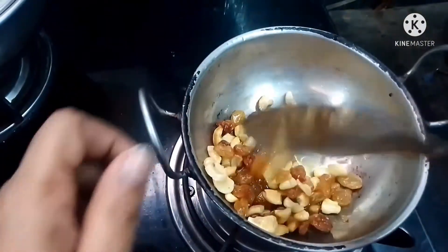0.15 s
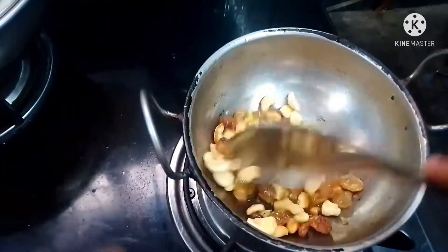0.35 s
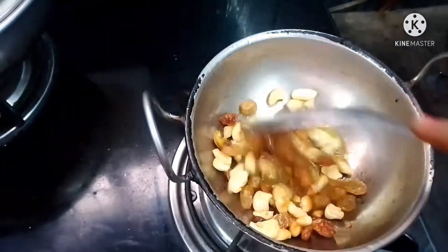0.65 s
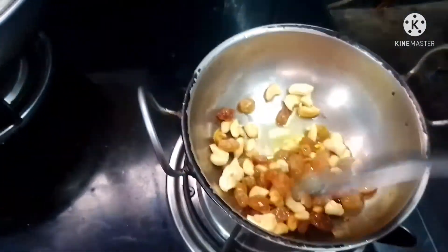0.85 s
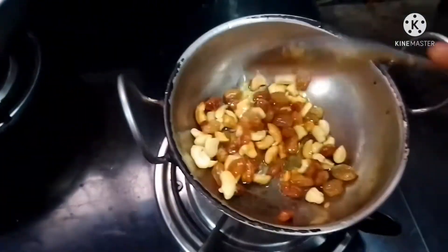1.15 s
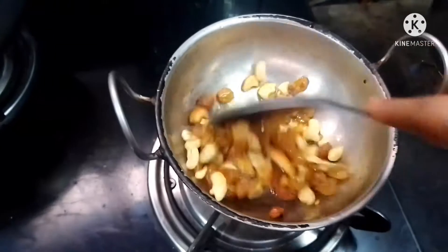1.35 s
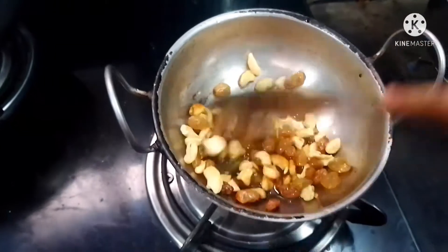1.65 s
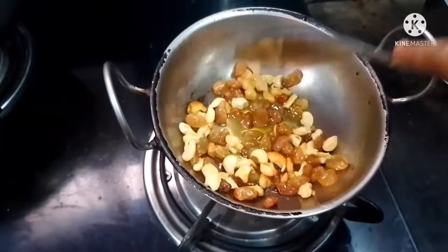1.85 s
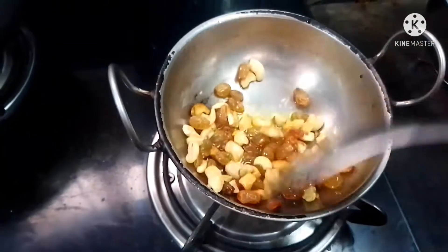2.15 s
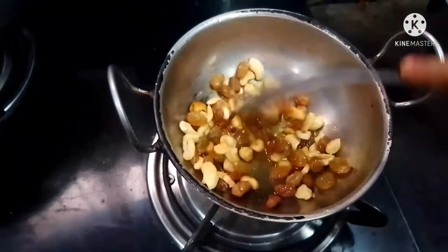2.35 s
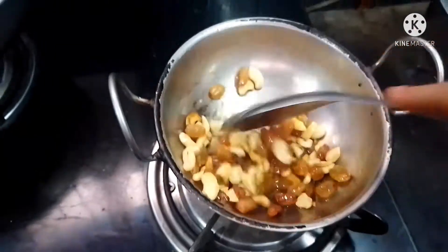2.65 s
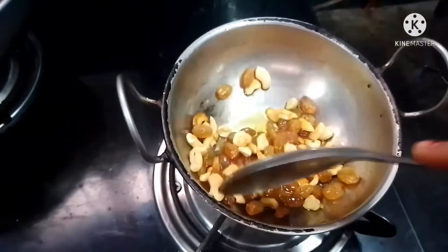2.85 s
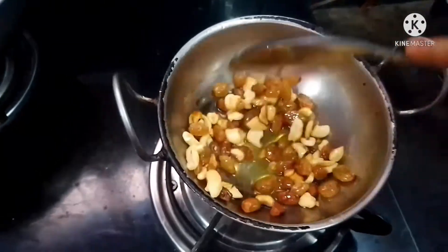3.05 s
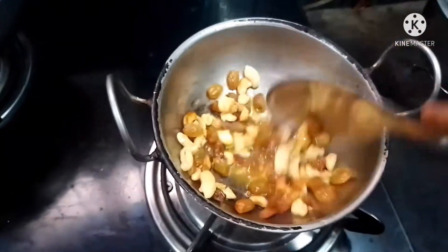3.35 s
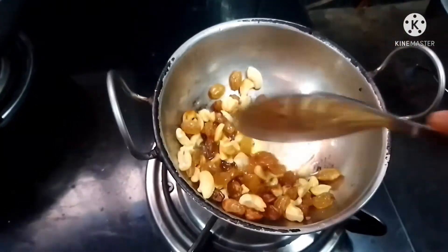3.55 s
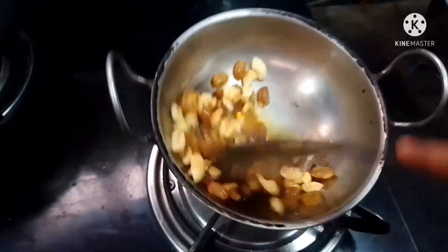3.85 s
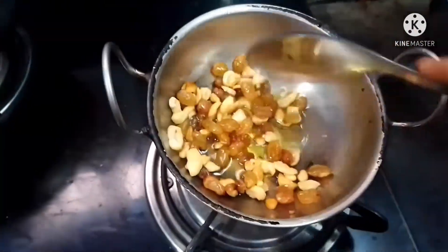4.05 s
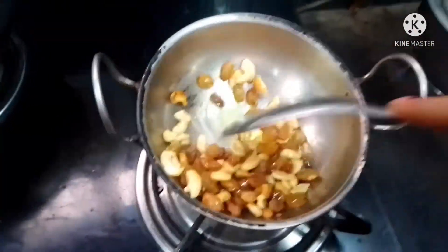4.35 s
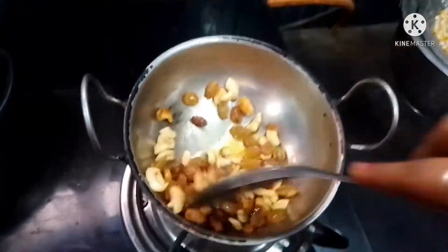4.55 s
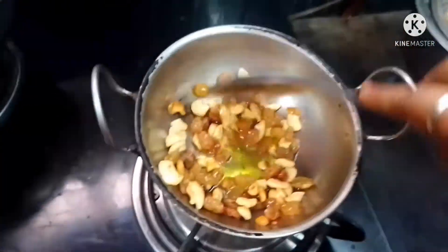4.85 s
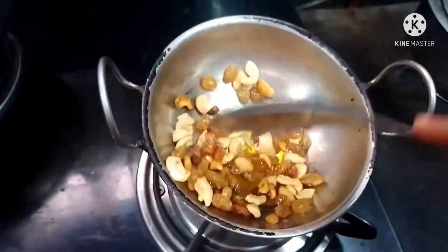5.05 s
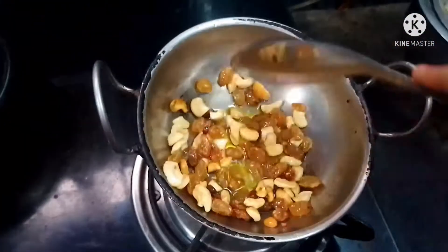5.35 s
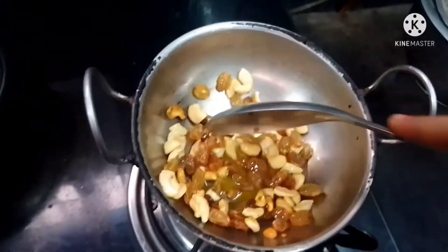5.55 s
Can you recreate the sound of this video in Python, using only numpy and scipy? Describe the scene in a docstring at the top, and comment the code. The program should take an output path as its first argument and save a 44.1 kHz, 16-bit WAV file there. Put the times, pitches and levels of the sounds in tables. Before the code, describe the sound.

Nuts and raisins fry in a little fat in a small steel pan, with a light sizzle and sharp, irregular pops. A metal spoon stirs throughout, scraping the pan and making the sizzle flare. It clinks and rings several times in the first two seconds, then carries on with softer scrapes and faint rasps. The microphone is close, with a gas flame rushing faintly behind.

```python
"""Cashews and raisins frying in ghee

At a kitchen stove, close to a small steel pan. Steam bubbles spit and crackle in a little fat.
A steel spoon knocks, rings and scrapes along the pan, and its strokes make the sizzle flare;
the gas flame rushes softly behind. One phone microphone: its port resonates in the treble,
and it overloads on the sharpest cracks."""
import sys
import numpy as np
from scipy import signal
from scipy.fft import rfft, irfft, next_fast_len
from scipy.io import wavfile
from scipy.ndimage import map_coordinates

SR = 44100
rng = np.random.default_rng(int(sys.argv[2]) if len(sys.argv) > 2 else 0)


def output_pcm(signal):
    """Save a mono or channel-first signal as 16-bit PCM at the path in sys.argv[1].

    Samples are clipped to [-1, 1] before scaling.
    """
    pcm = np.clip(np.atleast_2d(signal).T, -1, 1) * 32767
    wavfile.write(sys.argv[1], SR, np.round(pcm).astype(np.int16))


N = 251610
TIME = np.arange(N) / SR
HIT_SIZE = 16384   # samples in one crack with its echoes
REST_SIZZLE_DB = -43.5   # the sizzle's gain between strokes

# Levels are relative within each column.
# the loudest steam bubbles bursting in the fat: t/s, level/dB, f/Hz, Q
STEAM_BURSTS = [(0.1155, -10, 2530, 3.4), (0.125, -8, 4020, 5.2), (0.1827, -9, 4900, 0.93),
                (0.198, -9.5, 4050, 2.6), (0.2021, -6.5, 3380, 7.9), (0.3434, -12, 5300, 0.78),
                (0.4213, -17.5, 6200, 0.89), (0.4598, -18.5, 6900, 1.44), (.5302, -26, 8050, 1.4),
                (0.6717, -21, 8600, 0.69), (.8181, -7, 2700, 0.84), (0.8803, -18, 11300, 3.8),
                (0.9116, -26, 7080, 18), (0.942, -24.5, 7800, 3.1), (1.0241, -13, 5360, 0.93),
                (1.0455, -15, 3000, 0.66), (1.1007, -16, 5200, 1.5), (1.1305, -13, 4200, 1.4),
                (1.1988, -22, 10400, 12), (1.2088, -14.5, 5540, 1.9), (1.221, -20, 3250, 0.48),
                (1.2725, -17, 4100, 3.2), (1.3903, -11.5, 6300, 6), (1.445, 4.5, 3960, 0.81),
                (1.493, 6.5, 3330, 0.74), (1.528, -11, 8100, .7), (1.5814, 4.5, 2400, 0.39),
                (1.6965, -15, 5760, 3.8), (1.7074, -15.5, 3880, 2.9), (1.726, 1, 1820, 1.46),
                (1.781, -20, 5100, 15), (1.8147, -18.5, 4060, 9.5), (1.9015, -11.5, 8950, 0.82),
                (1.9533, -6.5, 8650, 0.74), (2.302, -13.5, 3500, 0.52), (2.3533, -22, 4030, 10),
                (2.3752, -17.5, 2620, 1.6), (2.4, -19.5, 5450, 9.6), (2.4678, -11, 4740, 0.64),
                (2.5904, -17, 5500, 0.38), (2.6487, -22.5, 5000, 0.5), (2.7023, -13, 9460, 2.9),
                (2.764, -15.5, 7400, 2.9), (2.853, -28, 8000, 6), (2.905, -23.5, 6830, 7.4),
                (2.918, -28.5, 8240, 6.5), (3.0134, -15, 6900, 2.5), (3.038, -22, 7970, 9.1),
                (3.187, 5.5, 3130, 0.22), (3.3622, -25.5, 4920, 4.9), (3.4793, -20, 6100, 0.41),
                (3.6647, -23.5, 7870, 18), (3.701, -13, 7320, 8.9), (3.7143, -20, 5080, 13),
                (3.8174, -18, 8100, 1.06), (3.835, -13.5, 10450, 4.2), (3.889, -22.5, 10730, 31),
                (4.216, -35, 10200, 3.7), (4.265, -25, 11300, 2.9), (4.3293, -24, 6700, 7.1),
                (4.3544, -15, 1800, 2.3), (4.4635, -27.5, 8300, 6.6), (4.498, -27, 8860, 8),
                (4.5104, -19.5, 6560, 1.1), (4.6621, -19.5, 6040, 1.8), (4.9124, -25, 6900, 5.8),
                (5.0334, -28, 8440, 6), (5.071, -18, 8400, 4.7), (5.1387, -19.5, 4450, 2.5),
                (5.1658, -29, 8500, 13), (5.3382, -19, 5550, 4.2), (5.3914, -21, 3640, 6),
                (5.4688, -11.5, 3060, 3.7), (5.5576, -33, 8750, 14), (5.5652, -22.5, 4020, 9)]
# spectrum of the sizzling fat: f/Hz, level/dB
SIZZLE_SPECTRUM = [(1500, -56), (3000, -13), (5000, -4.5), (7000, -9), (10000, -2), (15000, 7)]
# strokes of the spoon: t/s, length/s, bowl dragging/dB, edge grating/dB, sizzle flare/dB
SPOON_STROKES = [(0.031, 0.016, -45, -29.5, -40), (0.109, 0.18, -64, -42, -20),
                 (.36, 0.16, -75, -55.5, -23.5), (0.697, 0.013, -41.5, -32.5, -12.5),
                 (0.764, 0.13, -54.5, -46.5, -28), (1.037, 0.024, -46, -41.5, -17),
                 (1.137, 0.11, -76, -55, -28), (1.345, 0.12, -35.5, -35, -33),
                 (1.504, 0.11, -46.5, -42, -36), (1.651, 0.14, -69, -40, -17),
                 (1.962, 0.17, -40, -36, -18.5), (2.298, 0.1, -51, -44, -16.5),
                 (2.7, 0.075, -50.5, -38.5, -38), (2.951, 0.051, -48.5, -46.5, -23),
                 (3.035, 0.18, -55.5, -48, -11.5), (3.596, 0.16, -54.5, -75, -21.5),
                 (3.962, .17, -77, -52.5, -35.5), (4.347, 0.042, -64, -42.5, -22),
                 (4.453, 0.093, -50.5, -56, -34), (4.647, 0.16, -52.5, -45, -53),
                 (4.935, 0.48, -63, -49, -58), (5.46, .12, -56.5, -46.5, -37)]
# spoon meets pan: t/s, click/dB, spoon ring/dB, pan ring/dB
SPOON_KNOCKS = [(0.0299, 2.5, -36, -64), (0.6955, -3.5, -21.5, -42.5), (1.0467, -42, -40.5, -56),
                (1.329, 10.5, -23, -34), (1.385, -31, -56, -37), (1.419, -13, -41, -54),
                (1.661, -21, -37.5, -51), (1.9708, 5.5, -23.5, -39), (2.031, -25, -32, -41)]
# the spoon's edge rubs on bare steel: t/s, length/s, level/dB
SPOON_RUBS = [(1.41, .05, -39), (1.67, 0.12, -46), (2.96, .23, -51), (3.97, .15, -52.5), (4.985, .085, -47)]
# the sliding spoon catches: t/s, length/s, starting f/Hz, level/dB
SPOON_CATCHES = [(1.04, 0.11, 440, -53.5), (2.32, 0.72, 2910, -60), (2.71, 0.14, 305, -48),
                 (2.93, 0.18, 295, -45), (2.93, 0.083, 835, -48), (3.02, 0.18, 2300, -54),
                 (3.61, 0.084, 820, -51.5), (3.62, 0.11, 430, -47), (4.46, 0.19, 305, -50.5),
                 (4.44, 0.097, 2290, -52.5), (4.645, .12, 2110, -52)]
# the spoon's modes: f/Hz, level/dB, t60/s
SPOON_MODES = [(4368, -1, .17), (5832, -9, .28), (6057, 0, .16), (6718, -16, .1), (8280, -9, .1),
               (8603, -13, .09)]
# the pan's modes, damped by the food: f/Hz, level/dB, t60/s
PAN_MODES = [(270, -7, .45), (328, -10, .28), (400, -12, .2), (620, -9, .25), (781, -3, .28), (922, -4, .3),
             (1093, -10, .25), (1370, -8, .2), (1600, -9, .22), (1790, -7, .15), (2277, -8, .18),
             (2480, -6, .16), (3060, 0, .13), (3548, -4, .14), (3950, -5, .16), (4990, -11, .14)]
# spectrum of the spoon's bowl dragging on the pan: f/Hz, level/dB
DRAG_SPECTRUM = [(90, -17), (120, -6), (160, -28), (210, -14), (265, 2), (340, 5), (420, 0), (560, -9),
                 (680, -12), (780, -8), (930, -3), (1300, -19)]
# spectrum of the spoon's edge grating: f/Hz, level/dB
GRATE_SPECTRUM = [(900, -39), (1500, 7.5), (2200, -1.5), (3000, -4), (4500, -34), (8000, 0.5)]
# spectrum of the burner and the kitchen behind it: f/Hz, level/dB
BURNER_SPECTRUM = [(25, -9), (40, -9), (65, -19), (113, -16), (165, -26), (250, -7), (340, -1), (440, -8),
                   (600, -15), (780, -10), (940, -8), (1400, -17), (1700, -19), (2400, -26)]


def spits():
    """Single loud bursts of steam through the fat; the harder, the snappier."""
    out = np.zeros(N)
    for start, db, hz, q in STEAM_BURSTS:
        add(out, start, from_db(db) * crack(hz, q, snap=-0.39 + 0.14 * (db + 13)))
    return out


def sizzle(flare, bubble_q=13.5):
    """A mist of tiny bursts, with sparser bubbles that each ring briefly at a pitch of their own."""
    f = np.fft.rfftfreq(N, 1 / SR)
    mist = coloured(grains(per_s=8000), SIZZLE_SPECTRUM)
    rings = sum(rfft(grains(per_s=25, spread_db=4)) * resonance(f, hz, bubble_q) * 1j * f / hz
                for hz in np.geomspace(3000, 13000, 16))
    bubbles = coloured(in_kitchen(irfft(rings, N)), SIZZLE_SPECTRUM)
    spurts = from_db(2.2 * drift(per_s=45))
    return flare * spurts * (from_db(-26.5) * mist + from_db(-26) * bubbles)


def crackle(flare, count=90, low_hz=3700, high_hz=10500):
    """Fainter bursts at random moments and pitches, stronger while the sizzle flares."""
    out = np.zeros(N)
    boost = (flare / from_db(REST_SIZZLE_DB)) ** 0.58
    for k, (when, pitch, strength) in enumerate(rng.random((count, 3))):
        i = int((k + when) / count * N)
        hz = low_hz * (high_hz / low_hz) ** pitch
        gain = from_db(-42.5 + 6 * strength) * boost[i]
        add(out, i / SR, gain * crack(hz, q=3.16, snap=-0.39))
    return out


def stirring():
    """Gains of drag, grating and sizzle: the spoon bites, eases, lifts; wet food meets hot steel."""
    drag_db, grate_db, sizzle_db = np.transpose(SPOON_STROKES)[2:]
    contact = dict(attack_s=0.0027, sag_db_per_s=38.5, release_db_per_s=128)
    drag = swells(drag_db, rest_db=-57.5, **contact)
    grate = swells(grate_db, rest_db=-60.5, **contact)
    flare = swells(sizzle_db, REST_SIZZLE_DB, attack_s=0.029, sag_db_per_s=0, release_db_per_s=197)
    return drag, grate, flare


def knocks():
    """Steel on steel: a click, then spoon and pan ring on."""
    clicks, spoon_rings, pan_rings = np.zeros((3, N))
    for start, click_db, spoon_db, pan_db in SPOON_KNOCKS:
        lowest, *upper = ringing(SPOON_MODES, scatter_db=3)
        upper_db = 1.08 * spoon_db - 2.5   # a harder knock rings brighter
        pan = ringing(PAN_MODES, scatter_db=0.5).sum(axis=0)
        add(clicks, start, from_db(click_db) * crack(hz=2200, q=0.41, snap=-0.49))
        add(spoon_rings, start, from_db(spoon_db) * lowest + from_db(upper_db) * sum(upper))
        add(pan_rings, start, from_db(pan_db) * pan)
    flutter = from_db(2.5 * drift(per_s=120))   # the spoon chatters along the pan
    return clicks + spoon_rings * flutter + radiated(pan_rings)


def scraping(drag, grate, damping=7.9):
    """The spoon sticks and slips; as the contact travels, it favours one pan mode after another."""
    slips = in_kitchen(grains(per_s=2500))
    out = from_db(-4.5) * drag * coloured(slips, DRAG_SPECTRUM)
    out += from_db(-10) * grate * coloured(slips, GRATE_SPECTRUM)
    for hz, db, t60 in PAN_MODES[:-4]:   # rubbing hardly reaches the highest modes
        mode = radiated(rubbed(slips, hz, t60 / damping))   # the pressed spoon shortens the ring
        force = from_db(-15) * drag if hz < 1200 else from_db(-24.5) * grate
        out += force * mode * from_db(db + 5.5 * drift(per_s=11))
    return out


def pan_shimmer(grate, count=26, low_hz=1929, high_hz=7190, t60=0.067):
    """Grating excites the pan's close-set upper modes, now one, now another."""
    slips = grains(per_s=2500)
    steps = (np.arange(count) + rng.random(count)) / count
    pitches = low_hz * (high_hz / low_hz) ** steps
    modes = sum(rubbed(slips, hz, t60) * from_db(4.5 * drift(per_s=11)) for hz in pitches)
    return from_db(-10.5) * grate * rms_one(modes)


def singing(damping=2.5):
    """The rubbed spoon swells into an unsteady ring, mostly in its lowest mode; contact damps it."""
    pressure = np.zeros(N)
    for start, length, db in SPOON_RUBS:
        add(pressure, start, from_db(db) * signal.windows.hann(int(length * SR)))
    slips = grains(per_s=2500)
    lowest, *upper = (from_db(db) * rubbed(slips, hz, t60 / damping) for hz, db, t60 in SPOON_MODES[:3])
    return pressure * (lowest + from_db(-13) * sum(upper))


def squeaks(pitch_sag=0.14, jitters_per_cycle=0.24):
    """The sliding spoon catches: a narrow groan or rasp that swells and falls in pitch."""
    out = np.zeros(N)
    for start, length, hz, db in SPOON_CATCHES:
        size = int(length * SR)
        phase = 2 * np.pi * np.cumsum(np.linspace(hz, hz * (1 - pitch_sag), size)) / SR
        travel = TIME[:size] * hz * jitters_per_cycle
        jitter = [np.interp(travel, np.arange(400), knots) for knots in rng.standard_normal((2, 400))]
        rasp = jitter[0] * np.sin(phase) + jitter[1] * np.cos(phase)
        add(out, start, from_db(db) * signal.windows.tukey(size, 0.7) * rasp)
    return out


def burner(hum_hz=119):
    """Behind the pan, the soft rush of the gas flame and a faint hum in the kitchen."""
    hum = coloured(rng.standard_normal(N), [(hum_hz * 0.7, -30), (hum_hz, 0), (hum_hz * 1.4, -30)])
    flame = coloured(rng.standard_normal(N), BURNER_SPECTRUM)
    return from_db(-61.5) * flame + from_db(-78) * hum


def echoes():
    """From one spot in the pan to the microphone: direct sound, bounces in the pan, then the kitchen."""
    t = TIME[:HIT_SIZE]
    path = np.zeros(HIT_SIZE)
    pan, kitchen = (-0.5, 0.012, 0.0004), (-1, 0.16, 0.003)
    for db, t60, delay_s in (pan, kitchen):
        bounces = rng.standard_normal(HIT_SIZE) * from_db(-60 * t / t60) * (t > delay_s)
        path += from_db(db) * bounces / np.linalg.norm(bounces)
    path[0] = 1
    return path


def in_kitchen(x):
    """A continuous sound with its echoes."""
    return signal.fftconvolve(x, echoes())[:N]


def crack(hz, q, snap):
    """A sudden pulse that radiates poorly below its resonance; snap is the exponent of its treble tilt."""
    f = np.fft.rfftfreq(2 * HIT_SIZE, 1 / SR)
    body = (f / hz) ** 2 * resonance(f, hz, q)
    treble = ((1 + 1j * f / 8000) / np.sqrt(2)) ** snap
    rise = resonance(f, hz=15000, q=0.9) ** 2
    return irfft(body * treble * rise * rfft(echoes(), 2 * HIT_SIZE))[:HIT_SIZE]


def ringing(modes, scatter_db):
    """One row per mode: a dying sine, struck a little differently each time."""
    hz, db, t60 = np.transpose(modes)[:, :, None]
    t = TIME[:2 * HIT_SIZE]
    strength = from_db(db + scatter_db * rng.standard_normal(db.shape)) * rng.choice([-1, 1], db.shape)
    return strength * from_db(-60 * t / t60) * np.sin(2 * np.pi * hz * t)


def rubbed(slips, hz, t60):
    """One mode kept ringing by a run of slips; rms 1."""
    decay = from_db(-60 / (t60 * SR))
    feedback = [1, -2 * decay * np.cos(2 * np.pi * hz / SR), decay ** 2]
    return rms_one(signal.lfilter([1, 0, -1], feedback, slips))


def radiated(x, low_hz=230):
    """The small pan radiates little below its lowest mode."""
    return signal.sosfilt(signal.butter(4, low_hz, "high", fs=SR, output="sos"), x)


def swells(levels_db, rest_db, attack_s, sag_db_per_s, release_db_per_s):
    """A gain that rises with each stroke, sags while it lasts and dies back to a resting level."""
    power = from_db(rest_db) ** 2
    for (start, length, *_), db in zip(SPOON_STROKES, levels_db):
        t = np.maximum(TIME - start, 0)
        fall_db = sag_db_per_s * t + release_db_per_s * np.maximum(t - length, 0)
        power = power + (np.minimum(t / attack_s, 1) * from_db(db - fall_db)) ** 2
    return np.sqrt(power)


def grains(per_s, spread_db=3):
    """Random clicks of uneven size."""
    sizes = from_db(spread_db * np.minimum(rng.exponential(1, N), 3.5)) * rng.choice([-1, 1], N)
    return sizes * (rng.random(N) < per_s / SR)


def drift(per_s):
    """A smooth random wander with a spread of about 1."""
    knots = rng.standard_normal(int(TIME[-1] * per_s) + 2)
    coarse = TIME[::32]
    return np.interp(TIME, coarse, map_coordinates(knots, [coarse * per_s], order=3, mode="nearest"))


def coloured(x, spectrum):
    """Give a steady signal a spectrum that rolls off past both ends; rms 1."""
    hz, db = np.transpose(spectrum)
    f = np.maximum(np.fft.rfftfreq(N, 1 / SR), 1)
    shape = from_db(np.interp(np.log(f), np.log(hz), db))
    rolloff = np.minimum(f / hz[0], 1) ** 2 * np.minimum(hz[-1] / f, 1) ** 2
    return rms_one(irfft(rfft(x) * shape * rolloff, N))


def resonance(f, hz, q):
    """Response of a mass on a spring, with Q no lower than 0.4."""
    return 1 / (1 - (f / hz) ** 2 + 1j * f / (hz * max(q, 0.4)))


def from_db(db):
    """Decibels to gain."""
    return 10 ** (np.asarray(db) / 20)


def rms_one(x):
    """Scale to unit power."""
    return x / np.sqrt(np.mean(x ** 2) + 1e-20)


def add(out, start_s, sound):
    """Mix a sound in at a time."""
    i = round(start_s * SR)
    out[i:i + len(sound)] += sound[:max(0, N - i)]


def limiter(x, threshold_db=0.5, release_db_per_s=250, attack_s=0.013):
    """Loud cracks slip through, then the phone's gain ducks for a moment."""
    over_db = np.maximum(20 * np.log10(np.abs(x) + 1e-9) - threshold_db, 0)
    release_db = release_db_per_s * TIME
    held_db = np.maximum.accumulate(over_db + release_db, axis=-1) - release_db
    lag = np.exp(-1 / (attack_s * SR))
    return x * from_db(-signal.lfilter([1 - lag], [1, -lag], held_db))


def scene():
    """Close at the stove, in mono: fat and spoon in front, the burner behind."""
    drag, grate, flare = stirring()
    frying = spits() + crackle(flare) + sizzle(flare)
    spoon = knocks() + scraping(drag, grate) + pan_shimmer(grate) + singing() + squeaks()
    return (frying + spoon + burner())[None]


def record(dry, port_hz=8408, port_q=12.9, cutoff_hz=15400):
    """The phone microphone: its port rings, peaks are limited and flattened, and the top is cut."""
    size = next_fast_len(N + HIT_SIZE)
    port = resonance(np.fft.rfftfreq(size, 1 / SR), port_hz, port_q)
    limited = limiter(irfft(rfft(dry, size) * port, size)[:, :N])
    ceiling = 0.7 * (1 + 0.03 * np.sign(limited))   # lopsided overload adds a soft thump
    flattened = limited / (1 + (limited / ceiling) ** 6) ** (1 / 6)
    return signal.sosfilt(signal.ellip(10, 0.1, 70, cutoff_hz, fs=SR, output="sos"), flattened)


dry = scene()
out = record(dry)
output_pcm(out)
```